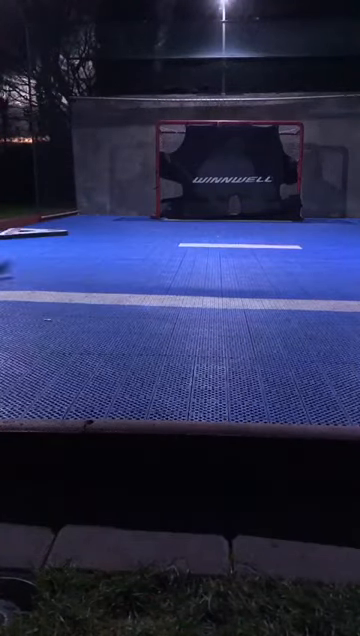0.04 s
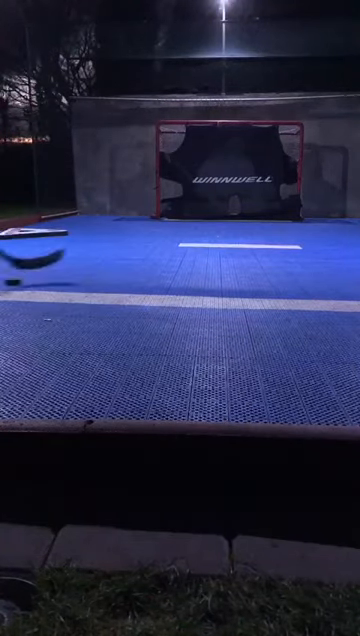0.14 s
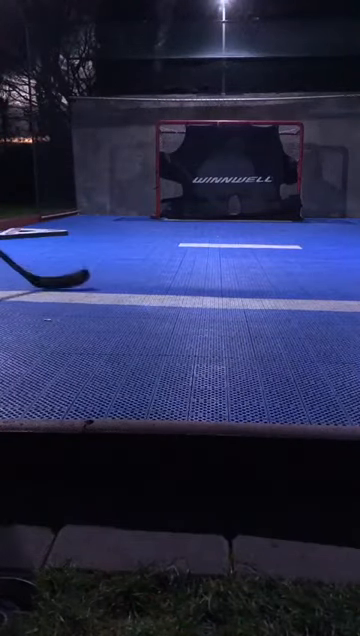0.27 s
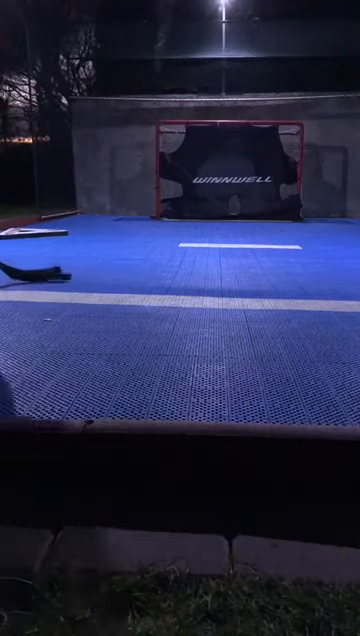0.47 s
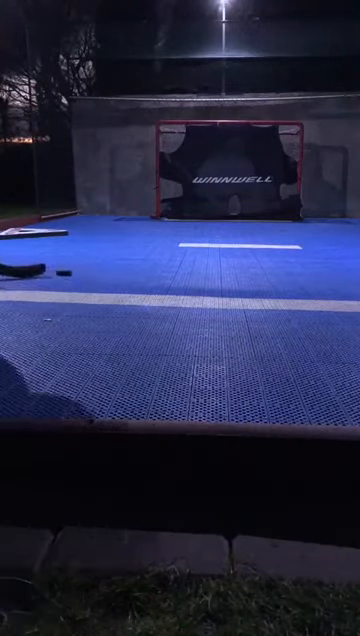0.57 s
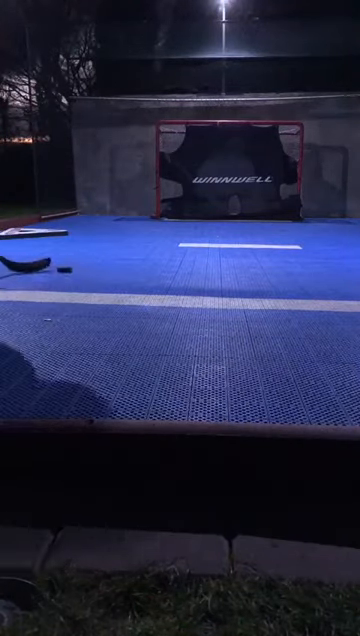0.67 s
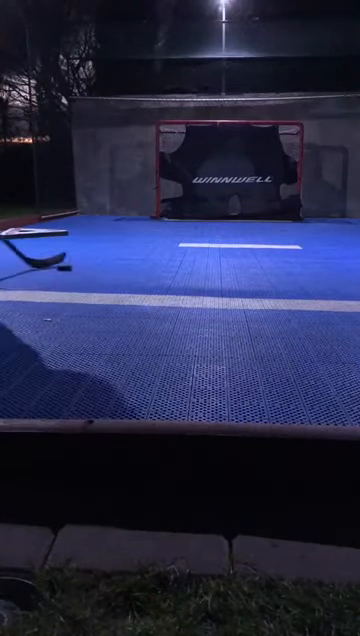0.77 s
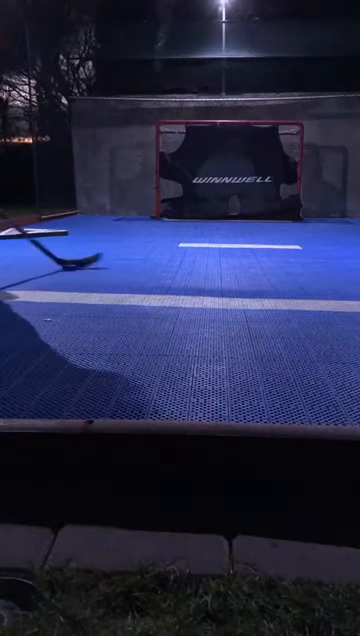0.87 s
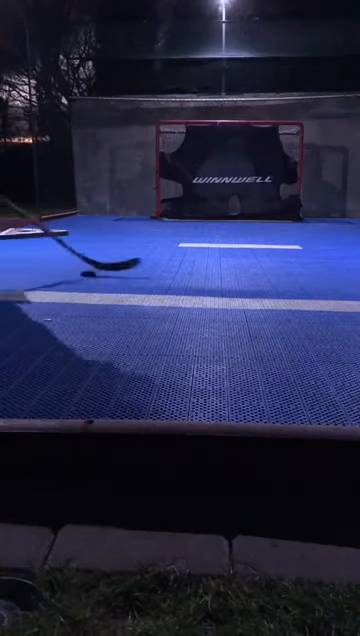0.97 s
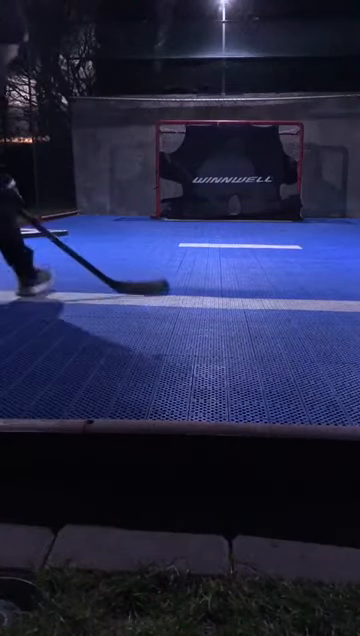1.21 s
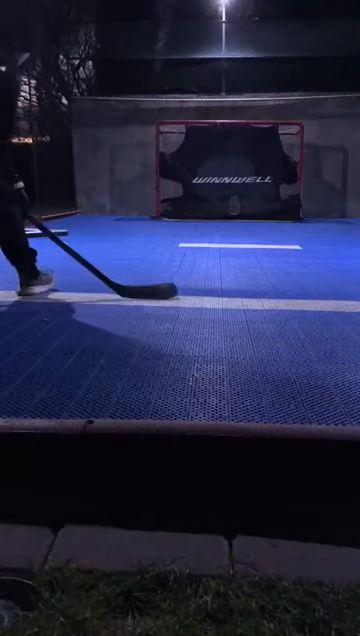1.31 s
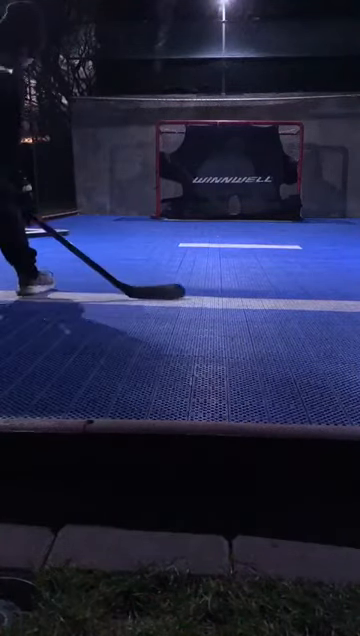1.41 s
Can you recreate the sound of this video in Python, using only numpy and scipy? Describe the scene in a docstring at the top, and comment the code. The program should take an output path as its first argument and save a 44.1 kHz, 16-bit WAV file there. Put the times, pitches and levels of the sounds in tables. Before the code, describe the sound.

A hockey stick taps a puck on hollow plastic tiles, lightly at 0.2 seconds and with a loud knock at 0.3, briefly echoing off nearby walls. The puck rasps and ticks over the ribbed floor until a sharp crack at 0.8, with bright blade scraping. A softer tap follows at 1.1, and scraping returns near 1.4. A faint low outdoor rumble continues throughout.

```python
"""Four sharp taps of a hockey stick on a puck sound across the hollow plastic tiles of an outdoor rink.
Each impact excites damped vibrations: a crack of contact, a knock of the blade and a thud of the tile.
Between taps, puck and blade rasp over the ribbed floor in dense tiny collisions, and the puck ticks
on the seams. Boards and a concrete wall reflect the taps over a low outdoor rumble."""
import sys
import numpy as np
from scipy import signal
from scipy.fft import rfft, irfft
from scipy.io import wavfile
from scipy.ndimage import uniform_filter1d

SR = 44100
rng = np.random.default_rng(int(sys.argv[2]) if len(sys.argv) > 2 else 0)


def generate_wav(signal):
    """Clip the signal to [-1, 1] and save it as 16-bit WAV at the path in sys.argv[1]."""
    frames = np.transpose(np.atleast_2d(signal))
    scaled = np.clip(frames, -1, 1) * 32767
    pcm = np.round(scaled).astype(np.int16)
    wavfile.write(sys.argv[1], SR, pcm)


N = 63945
RING_N = 22050  # samples in an impulse response


def undb(db):
    """Amplitude ratio of a level in decibels."""
    return 10 ** (np.asarray(db) / 20)


def unit(x):
    """Normalisation to rms 1."""
    return x / np.sqrt(np.mean(x ** 2))


def spectral_gain(points, size):
    """Gain at each FFT bin, interpolating level against log frequency."""
    hz, db = np.array(points).T
    f = np.maximum(np.arange(size // 2 + 1) * SR / size, 1)
    return undb(np.interp(np.log(f), np.log(hz), db))


def colour(x, points):
    """Minimum-phase filtering through (f/Hz, level/dB) points, keeping the power of white noise."""
    size = 2048
    cepstrum = irfft(np.log(unit(spectral_gain(points, size))))
    cepstrum[1:size // 2] *= 2  # folding onto positive time makes the filter causal
    cepstrum[size // 2 + 1:] = 0
    response = irfft(np.exp(rfft(cepstrum)))
    return signal.fftconvolve(x, response)[:len(x)]


def band(x, hz, kind, order=2):
    """Butterworth filtering."""
    return signal.sosfilt(signal.butter(order, hz, kind, fs=SR, output="sos"), x)


def blow(lo_hz, hi_hz, order=2):
    """Impulse response of a heavily damped body, peak 1."""
    response = band(signal.unit_impulse(RING_N) + 1e-18, [lo_hz, hi_hz], "band", order)
    return response / np.abs(response).max()


def ring(modes):
    """Free vibration: a sum of exponentially decaying modes."""
    t = np.arange(RING_N) / SR
    out = np.zeros(RING_N)
    for hz, db, t60 in modes:
        mode = np.exp(-np.log(1000) * t / t60) * np.sin(2 * np.pi * hz * t)
        out += undb(db) * band(mode, hz / 2, "high")
    return out


def resonate(drive, modes):
    """Forced vibration: the drive is convolved with a modal response of unit energy."""
    return signal.fftconvolve(drive, unit(ring(modes)) / np.sqrt(RING_N))[:N]


def burst(points, decay_s):
    """Exponential decay of coloured noise, with time constant decay_s."""
    envelope = np.exp(-np.arange(RING_N) / SR / decay_s)
    return colour(rng.standard_normal(RING_N) * envelope, points)


def add(out, at_s, x):
    """Superposition of x on out, starting at at_s."""
    i = max(int(at_s * SR), 0)
    out[i:i + len(x)] += x[:max(N - i, 0)]


def wander(per_s):
    """Smoothed random fluctuation of rms 1."""
    hold = int(SR / per_s)
    steps = np.repeat(rng.standard_normal(N // hold + 1), hold)
    return unit(uniform_filter1d(steps, hold)[:N])


# Spectrum of the outdoor rumble: f/Hz, relative level/dB
RUMBLE_SPECTRUM = [(20, -25), (35, -7), (58, 1.5), (78, 3), (110, -5.5), (165, 2), (210, -1), (300, -5.5),
                   (385, -3.5), (480, -11.5), (1000, -13), (2200, -29), (3500, -30), (10000, -28),
                   (12000, -36)]


def outdoor_rumble(level_db=-55.5):
    """Stationary noise from the surroundings, strongest at low frequencies."""
    spectrum = rfft(rng.standard_normal(N)) * spectral_gain(RUMBLE_SPECTRUM, N)
    return undb(level_db) * unit(irfft(spectrum, N))


# Spectrum of the scattered sound: f/Hz, relative level/dB
DIFFUSE_SPECTRUM = [(100, 11.5), (300, 11), (800, 3), (1400, 0), (2300, -9), (4000, -11.5), (8000, 3.5),
                    (14000, -1)]


def diffuse(x, t60_s, onset_s=0.0043):
    """Diffuse reflection: scattered sound builds up, then decays exponentially."""
    build_up = 1 - np.exp(-np.arange(RING_N) / SR / onset_s)
    response = burst(DIFFUSE_SPECTRUM, t60_s / np.log(1000)) * build_up
    return signal.fftconvolve(x, unit(response) / np.sqrt(RING_N))[:N] / 2


# Echoes from the boards and the wall: delay t/s, level/dB, low-pass cutoff f/Hz
ECHO_PATHS = [(.0219, 1, 2600), (.0348, 2, 1970), (.0402, -8, 1800), (.0565, -36, 2000)]


def reflections(direct, sent):
    """Reflection: boards and wall return delayed, dull slaps, with scatter and a thin open-air tail."""
    out = np.zeros(N)
    for delay, db, top_hz in ECHO_PATHS:
        add(out, delay, undb(db) * band(sent, top_hz, "low", order=4))
    wall_delay = ECHO_PATHS[1][0]
    wall_scatter = diffuse(band(sent, 2400, "low", order=4), t60_s=0.095)
    add(out, wall_delay, undb(5) * wall_scatter)
    tail = undb(-10.5) * diffuse(direct, t60_s=0.58)
    return out + tail


def rib_collisions(levels, hits_per_s=3200, spread_db=3.0, flicker_db=2.28):
    """Shot noise: random tiny collisions with the ribs, their level following the contact pressure."""
    hits = (rng.random(N) < hits_per_s / SR) * rng.choice([-1, 1], N)
    strengths = undb(spread_db * np.minimum(rng.exponential(size=N), 5))
    level_db = np.interp(np.arange(N) / SR, *np.array(levels).T)
    level_db += flicker_db * wander(per_s=130)
    return unit(hits * strengths) * undb(level_db)


def friction(levels, spectrum, modes, ring_db):
    """Roughness noise: the collisions are heard as a rasp and also drive a few resonances."""
    drive = rib_collisions(levels)
    return colour(drive, spectrum) + undb(ring_db) * resonate(drive, modes)


# Excitation of the sliding puck: t/s, level/dB
SLIDE_LEVELS = [(0, -57.5), (.06, -62.5), (.12, -62.5), (.2, -70), (.27, -52), (.4, -48.5), (.51, -48.5),
                (.55, -52), (.63, -48), (.74, -58), (.785, -47.5), (.82, -49.5), (.86, -43.5), (.9, -57.5),
                (1.08, -65.5), (1.12, -55.5), (1.2, -58), (1.28, -62.5), (1.39, -74), (1.432, -57.5),
                (1.45, -49)]
# Spectrum of its rasp: f/Hz, relative level/dB
SLIDE_SPECTRUM = [(150, -11), (500, -15), (900, -3.5), (1400, 1.5), (1900, 0.5), (2350, 1.5), (2850, -5),
                  (3600, -12.5), (7000, -19), (12000, -23)]
# Resonances rung by sliding and by dragging: f/Hz, relative level/dB, T60/s
SLIDE_RESONANCES = [(2126, 5, 0.023), (2267, -3.5, .05)]


def puck_slide():
    """Sliding friction: the puck crosses the ribs with a midrange rasp."""
    return friction(SLIDE_LEVELS, SLIDE_SPECTRUM, SLIDE_RESONANCES, ring_db=-14)


# Excitation of the scraping blade edge: t/s, level/dB
SCRAPE_LEVELS = [(0, -67.5), (.2, -72), (.29, -68), (.335, -49.5), (.37, -63), (.5, -64), (.58, -54.5),
                 (.62, -62), (.68, -56), (.745, -57), (.78, -44), (.8, -44), (.818, -58), (.848, -42),
                 (.864, -43.5), (.882, -57), (.94, -67.5), (1.05, -72), (1.2, -76), (1.38, -86),
                 (1.45, -82)]
# Spectrum of its rasp: f/Hz, relative level/dB
SCRAPE_SPECTRUM = [(500, -32), (2000, -15), (3200, 1.5), (5000, -1), (6500, -6), (8500, -14.5),
                   (11000, -15), (14000, -18.5)]
# Resonances rung by scraping: f/Hz, relative level/dB, T60/s
SCRAPE_RESONANCES = [(2696, 1.5, 0.033), (3840, -9, .015), (4600, -0.5, 0.019), (5070, -4, 0.021),
                     (6950, -17, 0.016)]


def blade_scrape():
    """Edge friction: the blade scrapes the tiles with a bright rasp."""
    return friction(SCRAPE_LEVELS, SCRAPE_SPECTRUM, SCRAPE_RESONANCES, ring_db=-9.5)


# Excitation of the blade dragged flat: t/s, level/dB
DRAG_LEVELS = [(.75, -75), (.79, -38.5), (.83, -52), (.9, -74), (1.09, -84), (1.115, -69), (1.19, -59.5),
               (1.25, -70), (1.31, -71), (1.39, -86), (1.433, -47.5), (1.45, -61.5)]


def blade_drag():
    """Resonance: dragged flat on the tiles, the blade hums at its natural frequencies."""
    return resonate(rib_collisions(DRAG_LEVELS), SLIDE_RESONANCES)


# Catches of the puck on seams: t/s, relative level/dB
SEAM_CATCHES = [(.070, -41), (.259, -33), (.266, -35), (0.407, -40), (.453, -32.5), (0.776, -25.5),
                (0.785, -43), (0.79, -28), (0.845, -44), (.860, -31), (.934, -41), (1.0219, -46)]


def seam_ticks(decay_s=0.0013):
    """Transient excitation: the puck catches on a joint between tiles and gives a tick of noise."""
    out = np.zeros(N)
    for at, db in SEAM_CATCHES:
        grit = undb(-6) * burst(SCRAPE_SPECTRUM, decay_s)
        body = burst(SLIDE_SPECTRUM, decay_s)
        add(out, at, undb(db) * (grit + body) / 2)
    return out


def tile_thud(centre_hz, edge_ratio=1.29, sag_hz=205, settle_hz=130):
    """Damped response of a hollow tile: it thuds, gives slowly, then drops back onto the ground."""
    out = np.zeros(N)
    add(out, 0, blow(centre_hz / edge_ratio, centre_hz * edge_ratio))
    add(out, 0.00403, undb(-10) * blow(sag_hz / 2, sag_hz * 2))
    add(out, 0.00823, undb(-30.5) * blow(settle_hz / edge_ratio, settle_hz * edge_ratio))
    return out


# Spectrum of the contact chatter: f/Hz, relative level/dB
RATTLE_SPECTRUM = [(80, -10), (300, 2.5), (1000, 5), (2500, 6), (3500, -1.5), (4300, -1), (6000, 0),
                   (7400, -4.5), (8600, -11), (10500, -7.5), (11600, -10.5), (14000, -31)]
# Modes of the contact crack, the blade and the floor: f/Hz, relative level/dB, T60/s
CRACK_RESONANCES = [(4400, -39, 0.013), (4910, -13, 0.0081)]
BLADE_RESONANCES = [(1440, -0.5, 0.012), (2093, 0.5, 0.022), (2315, -21, 0.15), (2672, -8.5, 0.027)]
FLOOR_RESONANCES = [(161.5, -9, 0.17), (202, -10.5, 0.18), (284.8, -2.5, 0.23), (324.3, -4, 0.2),
                    (442, -4.5, 0.11), (620, -12.5, 0.15)]
# Impacts of stick on puck: t/s, crack level/dB, rattle level/dB, knock level/dB, knock lag t/s,
# blade ring level/dB, thud level/dB, thud f/Hz, thud lag t/s, floor ring level/dB, echo level/dB
IMPACTS = [(.2230, -30, -23, -37, 0.001875, -22, -16.5, 777, 0.00189, -46, -23.5),
           (0.2984, -26, -22.5, -1.7, .0003, -21.5, -17, 565, 0.0015, -45.5, -16.5),
           (.8020, -6.5, -21.5, -21, .0001, -35, -22, 348, 0.00219, -33, -28),
           (1.1025, -39, -37.5, -27, .0013, -31, -30, 597, 0.0017, -60, -22.5)]


def stick_taps():
    """Impact sets blade and tile vibrating; returns the direct sound and the part sent to the walls."""
    direct, sent = np.zeros(N), np.zeros(N)
    for (at, crack_db, rattle_db, knock_db, knock_lag, blade_db,
         thud_db, thud_hz, thud_lag, floor_db, echo_db) in IMPACTS:
        crack = undb(crack_db) * (blow(lo_hz=3130, hi_hz=6630) + ring(CRACK_RESONANCES))
        rattle = undb(rattle_db) * burst(RATTLE_SPECTRUM, decay_s=0.0037)
        knock = undb(knock_db) * blow(lo_hz=1135, hi_hz=2162, order=3)
        blade_ring = undb(blade_db) * ring(BLADE_RESONANCES)
        tap = np.zeros(N)
        add(tap, at, crack + rattle)
        add(tap, at + knock_lag, knock + blade_ring)
        add(tap, at + thud_lag, undb(thud_db) * tile_thud(thud_hz))
        direct += tap
        sent += undb(echo_db) * tap
        add(direct, at + thud_lag, undb(floor_db) * ring(FLOOR_RESONANCES))
    return direct, sent


def scene():
    """Superposition of taps, friction, reflections, ticks and rumble in one channel."""
    direct, sent = stick_taps()
    rubbing = puck_slide() + blade_scrape() + blade_drag()
    return (direct + rubbing + reflections(direct, sent) + seam_ticks() + outdoor_rumble())[None]


def record(dry, low_cut_hz=46, top_hz=11600):
    """Band limiting: a high-pass thins the deep bass and a steep low-pass cuts the top."""
    thinned = band(dry, low_cut_hz, "high")
    return signal.sosfilt(signal.ellip(10, .2, 70, top_hz, fs=SR, output="sos"), thinned)


dry = scene()
out = record(dry)
generate_wav(out)
```